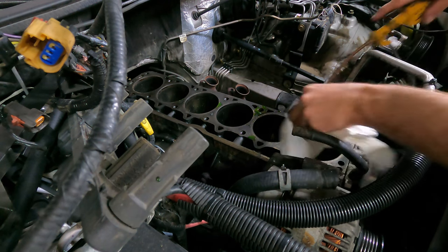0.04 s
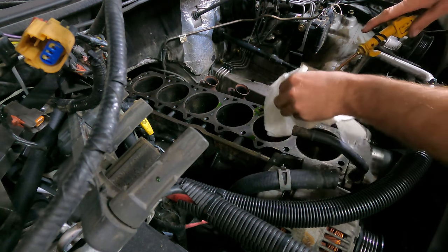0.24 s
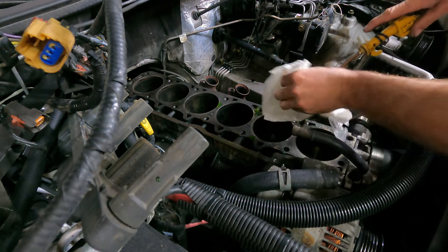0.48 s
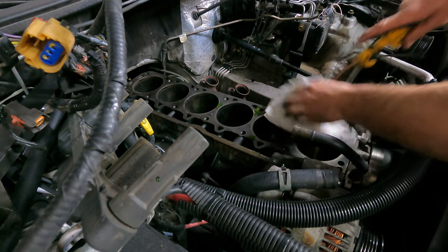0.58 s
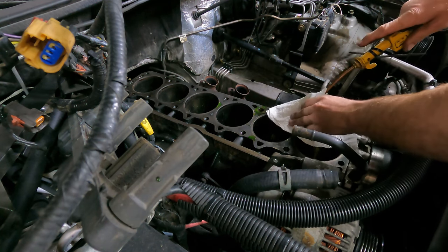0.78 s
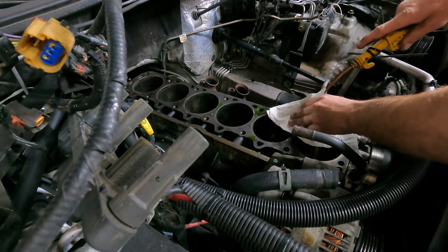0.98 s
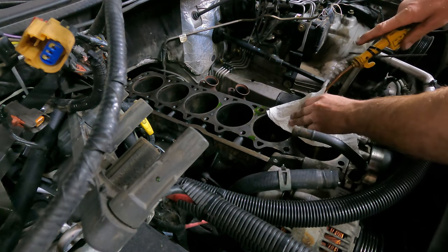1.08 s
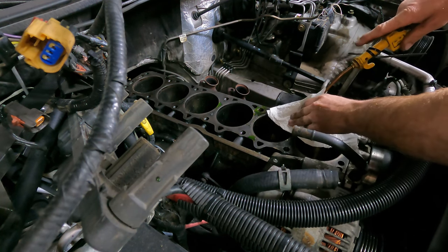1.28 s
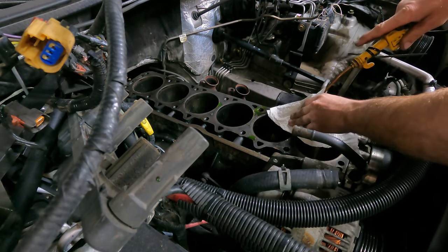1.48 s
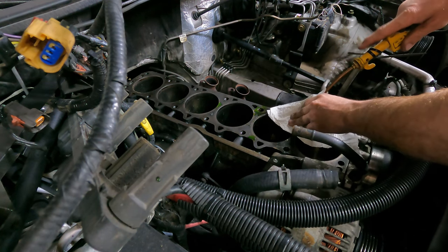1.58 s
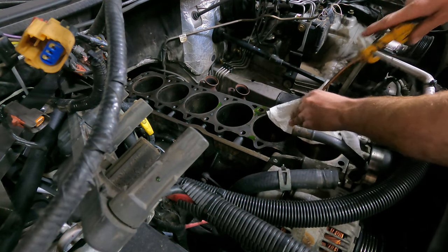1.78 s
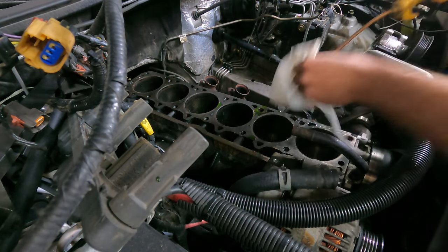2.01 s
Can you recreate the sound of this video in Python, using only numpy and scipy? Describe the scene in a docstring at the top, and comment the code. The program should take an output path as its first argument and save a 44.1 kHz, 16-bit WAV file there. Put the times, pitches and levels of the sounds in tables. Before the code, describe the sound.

Four quick blasts of compressed air hiss into metal holes after faint taps and cloth rustle

```python
"""A compressed-air blow gun gives four short blasts into the bolt holes of an engine block, under a rag.
Each blast is a turbulent hiss: noise shaped by the cavities and gated by the valve, with a breathy whistle.
Low pressure pulses mark most changes of flow. Beforehand the nozzle taps the metal, the rag slides into
place as enveloped noise, and the hand settles with damped thuds. The workshop adds a diffuse tail, over an
electric hum of sine tones and filtered-noise room air; a level control holds down the loud parts."""
import sys
import numpy as np
from scipy import signal
from scipy.fft import rfft, irfft
from scipy.io import wavfile
from scipy.ndimage import uniform_filter1d

SR = 44100
rng = np.random.default_rng(int(sys.argv[2]) if len(sys.argv) > 2 else 0)


def store_wav(level_fs):
    """Save 16-bit WAV to argv[1]."""
    pcm = np.round(np.clip(np.atleast_2d(level_fs), -1, 1) * 32767)
    wavfile.write(sys.argv[1], SR, pcm.T.astype(np.int16))


N = 90404
TIME, BINS = np.arange(N) / SR, np.fft.rfftfreq(N, 1 / SR)  # [s], [Hz]

# Blasts of air: (valve half open [s], valve starts to shut [s], level [dB], rise [s], release [s],
# nozzle depth in the hole [0-1], whistle [Hz])
BLASTS = [(1.0298, 1.08, -13, 0.013, 0.0086, 0.17, 8420), (1.231, 1.297, -17, 0.0045, .012, 0.97, 4150),
          (1.43, 1.535, -16.5, 0.0056, 0.009, 0.74, 3550),
          (1.6395, 1.743, -17.5, 0.0057, 0.0082, 0.99, 4950)]
# Hiss with the nozzle above the hole and down inside it: (frequency [Hz], relative density [dB per Hz])
JET_ABOVE = [(60, -8), (200, -8), (450, -12.5), (700, -9.5), (900, -15), (1080, -8), (1350, -14),
             (1700, -5), (3500, 0.5), (6200, 0.5), (8600, 1.5), (9300, -7), (12300, -2.5), (15500, -15)]
JET_INSIDE = [(60, -16), (200, -13.5), (380, -14.5), (520, -7.5), (900, -12), (1700, -4.5), (3000, 0.5),
              (4800, 2), (5800, -0.5), (8200, -2.5), (9500, -11.5), (11000, -26), (12500, -47),
              (15500, -44)]
# Resonances of the nozzle and the cavities:
# (frequency [Hz], width [Hz], boost above the hole [dB], boost inside it [dB])
CAVITY_RINGS = [(655, 110, 5, 4), (2305, 80, 10, 5), (2897, 45, 6, 4), (3040, 30, 8, 4), (4224, 30, 4, 6),
                (4823, 25, 3, 7), (5030, 70, 5, 4), (5484, 30, 10, 4), (6316, 30, 4, 6), (7528, 40, 7, 6),
                (8163, 40, 10, 9), (8423, 35, 9, 4), (8705, 45, 11, 6), (10090, 80, 9, 7),
                (10800, 250, -16, 0)]
# Likeness of left and right: (frequency [Hz], likeness [0-1])
LIKENESS = [(3600, .999), (4600, .92), (9000, .8), (15000, .45)]
# Sideways lean with the nozzle above the hole: (frequency [Hz], left minus right [dB])
LEAN = [(9000, -2), (12000, -8), (15000, -12)]
# Turbulence under the rag: (frequency [Hz], relative density [dB per Hz])
BUFFET = [(20, 5.5), (40, 0.5), (130, 1), (200, -6), (320, -15), (700, -47)]
# Pressure puffs as the flow starts or stops:
# (time [s], level [dB], half width [s], direction [-1 starts, +1 stops])
PUFFS = [(1.0924, -13.5, 0.0023, 1), (1.243, -20, 0.0035, -1), (1.310, -15, 0.0024, 1),
         (1.439, -14, 0.0024, -1), (1.5405, -14, 0.0022, 1), (1.65, -22.5, 0.0025, -1),
         (1.7508, -16, 0.0026, 1)]
# Nozzle touching the block: (time [s], level [dB], contact decay [s], ring of that spot [Hz])
TAPS = [(0.2025, -43.5, 0.0087, 1220), (0.212, -50, 0.023, 3055), (0.227, -46.5, 0.011, 615),
        (0.423, -49.5, 0.0059, 4380), (0.425, -53.5, 0.008, 1730), (0.965, -57.5, 0.0023, 2280)]
# Metal under the nozzle: (frequency [Hz], relative density [dB per Hz])
TAP_COLOUR = [(200, -21.5), (600, 9), (820, -6), (1150, 1), (3100, -5.5), (4000, -6.5), (6500, -11.5),
              (11000, -49.5)]
# Rag sliding on the block: (middle [s], half length [s], level [dB])
RUBS = [(0.295, 0.01, -62), (0.37, 0.09, -70), (0.616, 0.051, -58.5), (0.656, 0.028, -49),
        (0.71, 0.02, -51), (0.779, 0.073, -61.5)]
# Swish of the cloth: (frequency [Hz], relative density [dB per Hz])
RUB_COLOUR = [(300, -22), (600, 2.5), (820, -9.5), (1120, 1.5), (1800, -4.5), (4500, -8.5), (5400, -26.5),
              (12000, -46.5)]
# Hand and rag settling on the block: (time [s], level [dB], contact decay [s])
KNOCKS = [(0.694, -41.5, 0.012), (0.711, -44, 0.0065), (0.765, -36, 0.006)]
# Modes of the padded block: (frequency [Hz], level [dB], decay by 60 dB [s])
KNOCK_MODES = [(260.5, 5.5, 0.11), (544, -0.5, 0.071), (728, -12, 0.083)]
# Scuff of each knock: (frequency [Hz], relative density [dB per Hz])
KNOCK_COLOUR = [(130, 1.5), (600, -10.5), (1200, -26), (4000, -56)]
# Hand leaning on the block: (frequency [Hz], relative density [dB per Hz])
RUMBLE = [(40, -5), (150, 5.5), (260, 1), (800, -56)]
# Workshop reverberation time: (frequency [Hz], decay by 60 dB [s])
ROOM_T60 = [(150, 0.44), (800, 0.5), (2500, 0.64), (5000, 0.8), (9000, 0.62)]
# Workshop reverberation strength: (frequency [Hz], level [dB])
ROOM_DB = [(60, -30.5), (150, -14), (300, -5.5), (700, -16), (2500, -10.5), (5000, -18), (9000, -17),
           (15000, -29)]
# Level of the main hum tone: (time [s], level [dB])
HUM_LEVEL = [(0, -34), (.5, -31.5), (1.08, -30), (1.17, -25.5), (1.4, -31.5), (1.6, -34.5), (1.9, -37.5),
             (2.04, -32.5)]
# Fainter lines of the hum: (frequency [Hz], level [dB])
HUM_LINES = [(120.2, -56.5), (195.5, -56)]
# Room air: (frequency [Hz], relative density [dB per Hz])
AIR = [(20, 9), (130, 2), (300, -9), (600, -26.5), (3000, -25), (8000, -36), (11000, -63), (15000, -77)]

SAG_DB_PER_S, FLUTTER_DB, FLUTTER_HZ = -34, 0.45, 70  # supply pressure during a blast
FILL_S, HOLLOW_HZ, HOLLOW_DB = 0.0079, 1360, 3.5  # hollow of the block, slow to fill and to empty
WHISTLE_DB, WHISTLE_WIDTH_HZ, WHISTLE_WANDER_HZ = -14.5, 120, 70.2
ECHO_SHARE, ECHO_SPREAD_S = 0.33, 0.012  # first reflections off the engine bay
BUFFET_DB, PATCHY_DB = -30, 2
TAP_RISE_S, TAP_WIDTH_HZ, TAP_RING_DB = 0.0018, 210, 16
KNOCK_RISE_S, KNOCK_SCUFF_DB = 0.0019, 3
RUMBLE_S, RUMBLE_HALF_S, RUMBLE_DB = 0.774, 0.16, -46
ROOM_DELAY_S, ROOM_FOCUS, PUFF_SPILL_DB = 0.012, 0.26, 5
HUM_HZ, HUM_WAVER_DB, AIR_DB = 60.1, 2.3, -53.5
LIMIT_DB, LIMIT_SHARE, RECOVER_DB_PER_S = -23, 0.42, 52
EDGE_HZ = 15680  # upper band limit


def blast(opens, shuts, db, rise, release, depth, whistle_hz, focus=1):
    """Jet noise: valve flow modulates turbulence, filtered by cavities to the extent of focus [0-1]."""
    def blend(above, inside):
        return (1 - depth) * above + depth * inside

    ramp = np.clip((TIME - opens) / (2 * rise), -np.pi, np.pi)
    opening = (1 + np.tanh(np.sinh(ramp))) / 2
    closing = np.exp(-np.maximum(TIME - shuts, 0) / release)
    sag_db = SAG_DB_PER_S * np.maximum(TIME - opens, 0)
    flow = opening * closing * amp(sag_db + FLUTTER_DB * drift(FLUTTER_HZ))

    rings_db = sum(blend(above, inside) * bump(hz, width) for hz, width, above, inside in CAVITY_RINGS)
    bay_db = 20 * np.log10(abs(bay()) + 1e-6)
    colour_db = blend(read(JET_ABOVE), read(JET_INSIDE)) + focus * (rings_db + bay_db)
    hiss = noise(colour_db, blend(read(LEAN), 0), spread=0.55)

    # The low part of the hiss follows the flow with a lag
    hollow = irfft(rfft(hiss) * np.exp(-(BINS / HOLLOW_HZ) ** 2), N)
    keep = np.exp(-1 / (FILL_S * SR))
    filled = signal.lfilter([1 - keep], [1, -keep], flow + 1e-12)

    direct = flow * (hiss - hollow)
    delayed = filled * (amp(HOLLOW_DB) * hollow + focus * whistle(whistle_hz))
    buffet = flow * amp(BUFFET_DB) * noise(read(BUFFET))
    return amp(db) * (direct + delayed) + buffet


def whistle(hz):
    """Edge tone at the rim of the hole: narrow-band noise whose centre wanders as the nozzle shakes."""
    turns = np.cumsum(hz + WHISTLE_WANDER_HZ * drift(24)) / SR
    swirl = drift(WHISTLE_WIDTH_HZ) + 1j * drift(WHISTLE_WIDTH_HZ)
    return amp(WHISTLE_DB) * (swirl * np.exp(2j * np.pi * turns)).real


def bay(count=12):
    """Comb interference: the frequency response of direct sound plus early reflections off the bay."""
    echoes = np.zeros(N)
    delays_s = rng.uniform(0.1, 1, count) * ECHO_SPREAD_S
    echoes[(delays_s * SR).astype(int)] = rng.choice([-1, 1], count)
    return 1 + ECHO_SHARE / np.sqrt(count) * rfft(echoes)


def bump(hz, width):
    """Resonance: a Lorentzian peak, 1 at its centre and one half at the edges of its width."""
    return 1 / (1 + (2 * (BINS - hz) / width) ** 2)


def puffs():
    """Unsteady flow: sudden changes of volume flow radiate low pressure pulses."""
    out = np.zeros(N)
    for s, db, half, direction in PUFFS:
        u = (TIME - s) / half
        out += direction * amp(db) * (1 - u ** 2) * np.exp(-u ** 2 / 2)
    return out


def patchy(x):
    """Random modulation: neighbouring times and frequencies swell and fade together."""
    z = signal.stft(x, nperseg=256)[2]
    patches = uniform_filter1d(rng.standard_normal(z.shape[1:]), size=3, axis=0)  # across frequency
    patches = unit(uniform_filter1d(patches, size=7, axis=1))  # across time
    return signal.istft(z * amp(PATCHY_DB * patches), nperseg=256)[1][:, :N]


def taps():
    """Contact excitation: brief nozzle scuffs, each coloured by the resonance of its spot."""
    out = 0
    for s, db, decay, hz in TAPS:
        colour_db = read(TAP_COLOUR) + TAP_RING_DB * bump(hz, TAP_WIDTH_HZ)
        out = out + amp(db) * contact(s, TAP_RISE_S, decay) * noise(colour_db)
    return out


def rag(grain_db=1.5, grain_hz=350, low_hz=350):
    """Sliding friction: cloth dragged over the block gives noise with a grainy envelope."""
    stroke = sum(amp(db) * np.exp(-((TIME - s) / half) ** 2) for s, half, db in RUBS)
    low_cut_db = -20 * np.log10(1 + (low_hz / (BINS + 1)) ** 2)
    return stroke * amp(grain_db * drift(grain_hz)) * noise(read(RUB_COLOUR) + low_cut_db)


def knocks():
    """Modal impact: padded thuds of damped sines and scuff noise, with a low rumble as the hand leans."""
    lean = np.exp(-((TIME - RUMBLE_S) / RUMBLE_HALF_S) ** 2)
    out = amp(RUMBLE_DB) * lean * noise(read(RUMBLE))
    scuff = amp(KNOCK_SCUFF_DB) * noise(read(KNOCK_COLOUR))
    for s, db, decay in KNOCKS:
        thud = contact(s, KNOCK_RISE_S, decay) * scuff
        for hz, mode_db, t60 in KNOCK_MODES:
            envelope = contact(s, KNOCK_RISE_S, t60 / np.log(1000))
            thud = thud + amp(mode_db) * envelope * np.sin(2 * np.pi * hz * (TIME - s))
        out = out + amp(db) * thud
    return out


def contact(s, rise, decay):
    """Contact force: a quick linear rise multiplied by an exponential fall."""
    return np.clip((TIME - s) / rise, 0, 1) * np.exp(-np.maximum(TIME - s, 0) / decay)


def workshop(x):
    """Diffuse reverberation: convolution with noise whose bands each decay at their own rate."""
    hz, t, z = signal.stft(noise(0 * BINS, spread=1), SR, nperseg=256)
    decay = np.exp(-np.log(1000) * t / read(ROOM_T60, hz)[:, None])
    decay = decay * (t > ROOM_DELAY_S)
    decay = decay / np.sqrt(N * np.mean(decay ** 2, axis=1, keepdims=True))  # equal energy per band
    level = amp(read(ROOM_DB, hz))[:, None]
    tail = signal.istft(z * decay * level, SR, nperseg=256)[1]
    return signal.fftconvolve(x, tail, axes=1)[:, :N]


def hum():
    """Periodic radiation: a strong mains tone of changing level and faint lines that waver in level."""
    def tone(hz):
        return np.sqrt(2) * np.sin(2 * np.pi * (hz * TIME + rng.random()))

    mains = amp(np.interp(TIME, *np.transpose(HUM_LEVEL))) * tone(HUM_HZ)
    lines = sum(amp(db + HUM_WAVER_DB * drift(rate_hz=3.0)) * tone(hz) for hz, db in HUM_LINES)
    return mains + lines


def room_air():
    """Stationary background noise: a constant random signal weighted toward the bass."""
    return amp(AIR_DB) * noise(read(AIR))


def noise(colour_db, lean_db=0, spread=0):
    """Spectral shaping: coloured stereo noise at unit rms; spread lets the treble differ by side."""
    mid, side = rfft(rng.standard_normal((2, N)))
    apart = np.clip(spread * (1 - read(LIKENESS)), 0, 1)
    mid, side = mid * np.sqrt(2 - apart), side * np.sqrt(apart)
    left = (mid + side) * amp(lean_db / 2)
    right = (mid - side) * amp(-lean_db / 2)
    return unit(irfft(np.array([left, right]) * amp(colour_db), N))


def drift(rate_hz):
    """Low-pass random process: Gaussian-filtered noise of unit rms."""
    return unit(irfft(rfft(rng.standard_normal(N)) * np.exp(-(BINS / rate_hz) ** 2), N))


def amp(db):
    """Logarithmic level: decibels to amplitude gain."""
    return 10 ** (np.asarray(db) / 20)


def unit(x):
    """Normalisation: scales to an rms of one."""
    return x / np.sqrt(np.mean(x ** 2) + 1e-20)


def read(points, hz=BINS):
    """Interpolation: reads a table along a logarithmic frequency axis."""
    f, value = np.transpose(points)
    return np.interp(np.log(hz + 1), np.log(f + 1), value)


def scene():
    """Superposition: blasts and handling, their reverberation, hum and room air add linearly."""
    jet = patchy(sum(blast(*row) for row in BLASTS)) + puffs()
    handling = taps() + patchy(rag()) + knocks()
    # The jet feeding the room is less coloured by the cavities and has stronger puffs
    spill = sum(blast(*row, focus=ROOM_FOCUS) for row in BLASTS) + amp(PUFF_SPILL_DB) * puffs()
    return jet + handling + workshop(spill + handling) + hum() + room_air()


def record(dry):
    """Dynamic compression and band limiting: a held, falling peak level sets the gain reduction."""
    power = uniform_filter1d((dry ** 2).mean(0), size=300)
    power_db = 10 * np.log10(abs(power) + 1e-12)
    fall_db = TIME * RECOVER_DB_PER_S
    peak_db = np.maximum.accumulate(power_db + fall_db) - fall_db
    over_db = np.maximum(peak_db - LIMIT_DB, 0)
    held = dry * amp(-LIMIT_SHARE * uniform_filter1d(over_db, size=200))
    low_pass = signal.firwin(511, EDGE_HZ, window=("kaiser", 9), fs=SR)
    return signal.oaconvolve(held, low_pass[None], "same")


dry = scene()
out = record(dry)
store_wav(out)
```